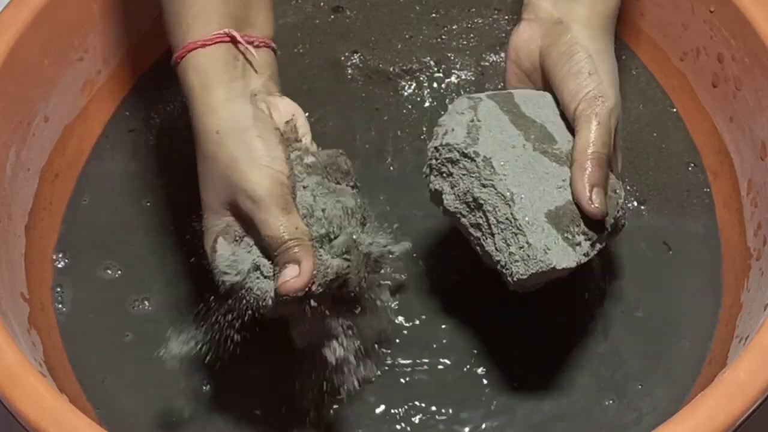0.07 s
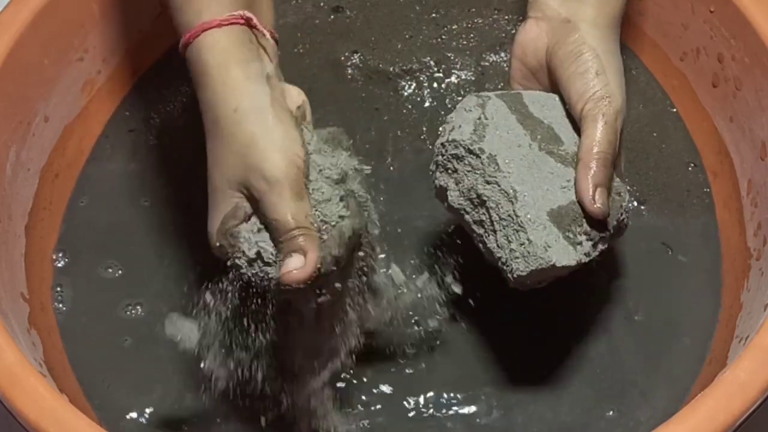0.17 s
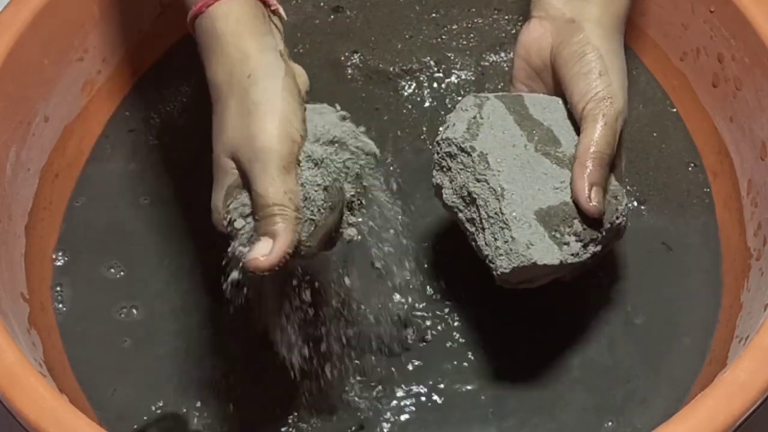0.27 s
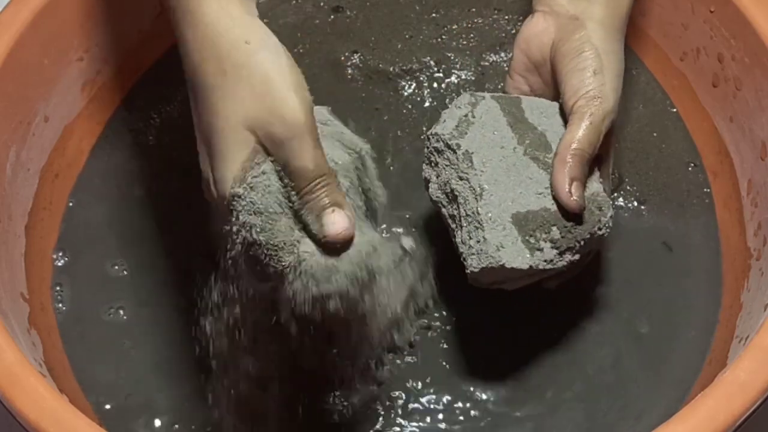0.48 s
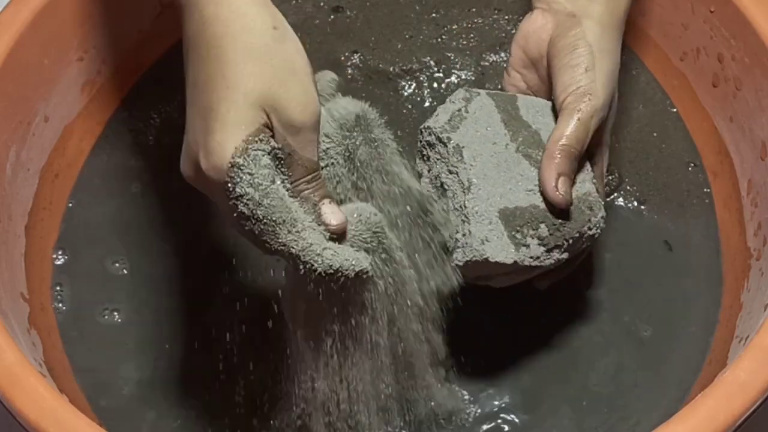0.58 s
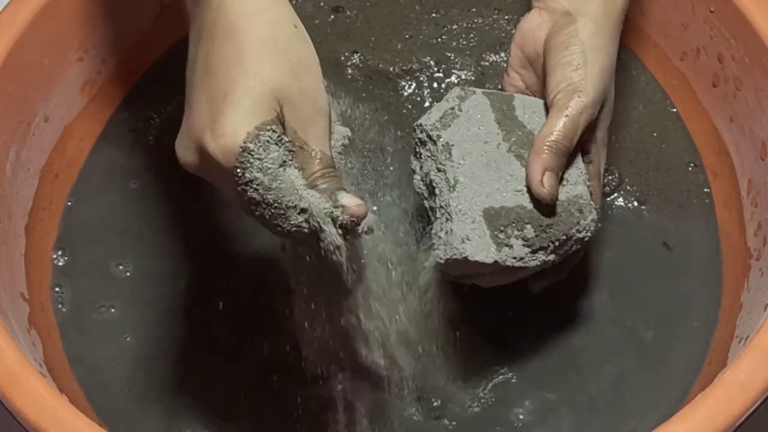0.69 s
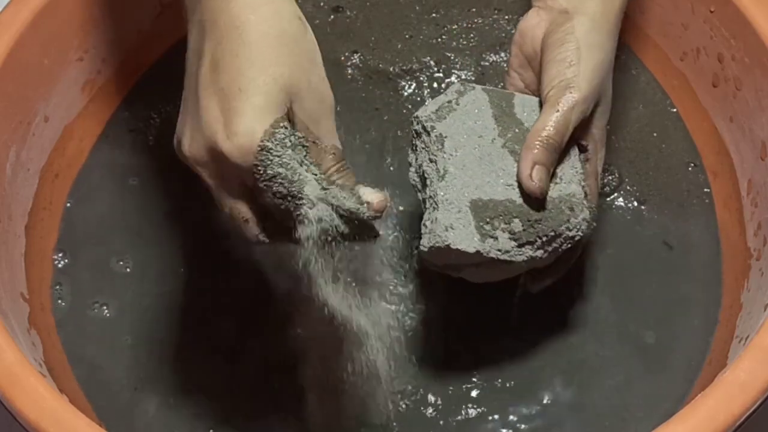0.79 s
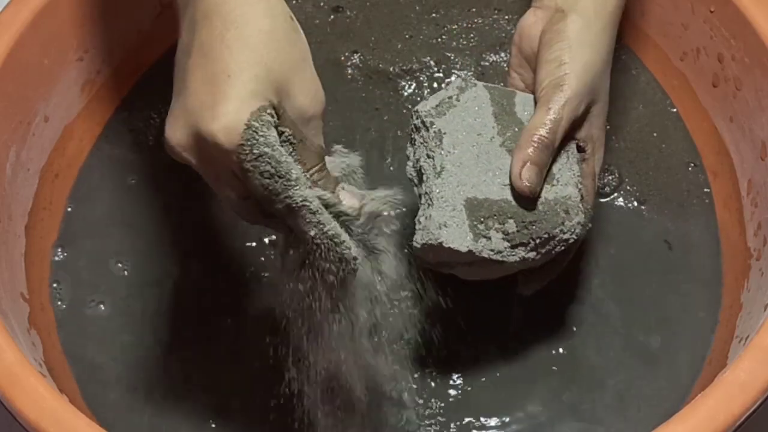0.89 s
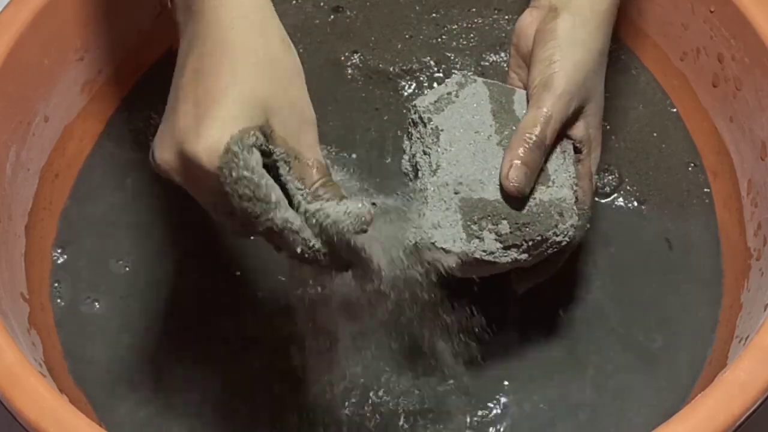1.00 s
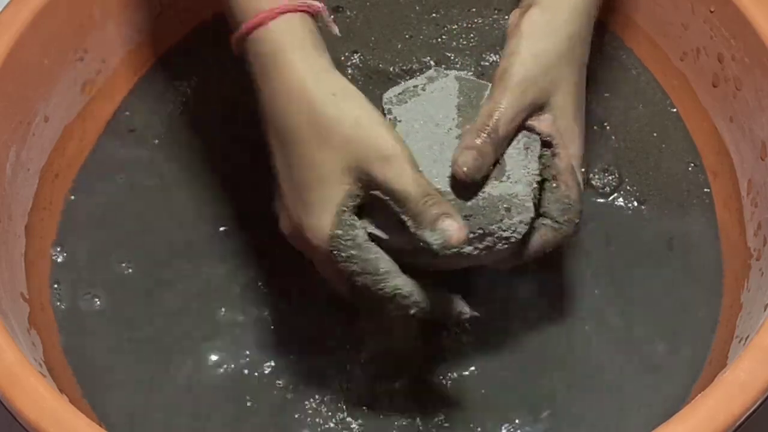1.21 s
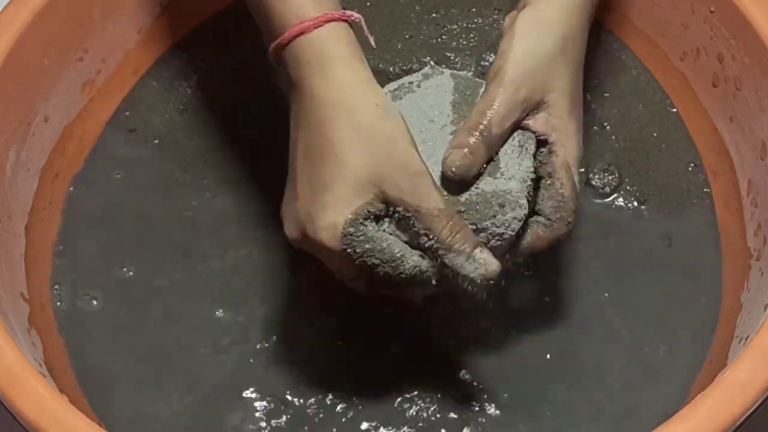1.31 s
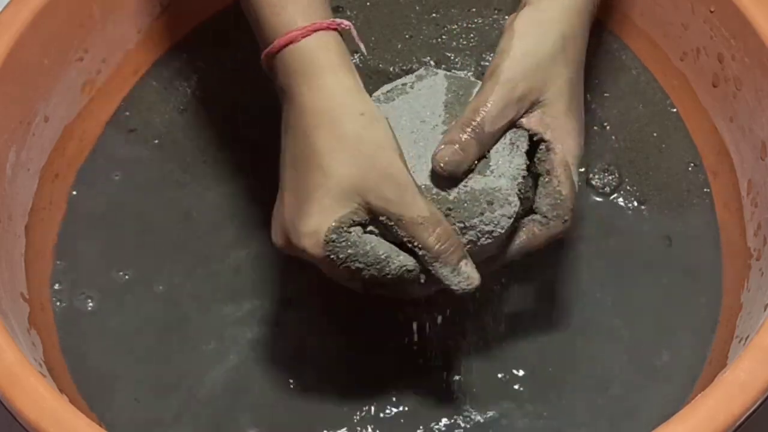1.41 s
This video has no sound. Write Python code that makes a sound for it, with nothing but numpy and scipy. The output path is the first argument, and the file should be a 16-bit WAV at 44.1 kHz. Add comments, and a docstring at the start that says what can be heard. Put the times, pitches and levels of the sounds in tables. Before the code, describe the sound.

Sand crumbles into a basin of water, heard close. A dry lump crunches faintly at about 0.1 seconds, and a clump lands with the loudest plop at 0.25. Smaller clumps and crumbs patter in with tiny bubbly plinks and a sandy fizz, thickest from 0.5 to 0.8 seconds. Lighter drips come around 1.0, thinning to faint ticks by 1.4, over a low room rumble.

```python
"""Sand crumbled into water

A hand crumbles dry sand over a plastic basin of water, close by. Clumps slap the surface and open
hollow cavities; crumbs tick and trap bubbles, which ring for a few ms as damped oscillators.
Fine sand fizzes and coarse grains tick in between. These sounds faintly excite the basin's modes
and the room's reverberation, and a low rumble lies underneath."""
import sys
import numpy as np
from scipy import signal
from scipy.fft import rfft, irfft
from scipy.io import wavfile
from scipy.ndimage import uniform_filter1d

SR = 44100
rng = np.random.default_rng(int(sys.argv[2]) if len(sys.argv) > 2 else 0)


def bounce(signal):
    """Save signal as a 16-bit WAV file at the path given by the first command-line argument."""
    frames = np.transpose(np.atleast_2d(signal))
    limited = np.clip(frames, -1, 1)
    pcm = np.round(limited * 32767).astype(np.int16)
    wavfile.write(sys.argv[1], SR, pcm)


N = 63945

# flow of falling sand: time_s, gain_db
SAND_FLOW = [(0, -6), (.075, -14.5), (0.132, -11), (.22, -3.5), (.3, -2), (.41, -10.5), (0.518, -2.5),
             (.61, -6.5), (.7, 1), (.84, -12.5), (.93, -8.5), (1.04, -6), (1.14, -10.5), (1.25, -13.5),
             (1.45, -15.5)]
# clumps hitting the water: start_s, slap_db, cavity_hz, cavity_db, cavity_decay_ms
CLUMP_IMPACTS = [(0.2476, -5, 298.4, -12.5, 3.48), (0.3115, -17.5, 482, -21.5, 3.63),
                 (0.4396, -51.5, 507, -30, 2.94), (.5060, -22.5, 410.8, -21, 2.55),
                 (0.5518, -28, 1057, -24.5, 2.48), (0.6544, -14.5, 272.4, -26.5, 4.76),
                 (0.7016, -18, 451.4, -28.5, 2.72), (0.742, -29.5, 1001, -33, 4.54)]
GRAINS_PER_S, CAVITY_ONSET_MS = 5000, 0.717
EVENT_MS = np.arange(SR // 20) * 1000 / SR  # time axis of one short event


def undb(db):
    """Decibels to amplitude ratio."""
    return 10 ** (np.asarray(db) / 20)


def level(x, db):
    """Scale to an rms level."""
    return x * undb(db) / np.sqrt(np.mean(x ** 2))


def add(out, start_s, x):
    """Superpose a short sound on the output."""
    i = max(0, int(start_s * SR))
    out[i:i + len(x)] += x[:max(0, N - i)]


def colour(x, points):
    """Minimum-phase filter through (frequency_hz, gain_db) points, by folding the cepstrum."""
    size = 8192
    hz, db = np.array(points).T
    grid_hz = np.maximum(np.arange(size // 2 + 1) * SR / size, 1)
    gain = undb(np.interp(np.log(grid_hz), np.log(hz), db))
    cepstrum = irfft(np.log(gain))
    cepstrum[1:size // 2] *= 2
    cepstrum[size // 2 + 1:] = 0
    return signal.fftconvolve(x, irfft(np.exp(rfft(cepstrum))))[:N]


def ring(hz, decay_ms, onset_ms=0.0536, rise=0.00276):
    """Damped oscillator that glides upward, as a bubble's pitch rises on nearing the surface."""
    pitch_hz = hz * (1 + rise * np.minimum(EVENT_MS / decay_ms - 1, 4))
    envelope = np.exp(-EVENT_MS / decay_ms) * (1 - np.exp(-EVENT_MS / onset_ms))
    return np.sin(2 * np.pi * np.cumsum(pitch_hz) / SR) * envelope


def impact(width_ms=0.0296, spray_db=-11, spray_ms=1.198):
    """Impact transient: one push and rebound of the surface, with a noise burst of spray."""
    u = EVENT_MS / width_ms
    decay = np.exp(-u)
    push = (1 - u) * decay
    push -= decay * push.sum() / decay.sum()  # the rebound cancels the push
    spray = rng.standard_normal(len(EVENT_MS)) * np.exp(-EVENT_MS / spray_ms)
    return push + undb(spray_db) * spray


def room_rumble():
    """Background noise of the room, strongest in the bass and fading slightly."""
    # rumble spectrum: frequency_hz, relative_density_db
    spectrum = [(20, -19), (42, -22.5), (58, -3), (73, 3), (100, 2), (170, -5.5), (300, -5.5), (500, -15),
                (1000, -30), (2500, -38), (6000, -35), (15000, -36)]
    fade_db_per_s = 0.7352
    rumble = level(colour(rng.standard_normal(N), spectrum), -46)
    return rumble * undb(-fade_db_per_s * np.arange(N) / SR)


def fine_sand():
    """Shot noise of grains, flickering hiss of dust and resonance of tiny bubbles follow the flow."""
    # spectrum of grains and dust: frequency_hz, relative_density_db
    spectrum = [(200, 7.5), (600, 17), (1200, 2), (2200, 6.5), (4000, 6), (6500, 7.5), (9000, 15.5),
                (15000, 3.5)]
    flicker_db, flicker_ms, grain_spread_db = 3.5, 3, 6.5
    bubbles_per_s, low_hz, high_hz, decay_cycles = 330, 1098.6, 4807, 6.32
    flow = undb(np.interp(np.arange(N) / SR, *np.array(SAND_FLOW).T))
    wander = uniform_filter1d(rng.standard_normal(N), int(flicker_ms * SR / 1000))
    flicker = undb(level(wander, 0) * flicker_db)
    grains = (rng.random(N) < GRAINS_PER_S / SR) * rng.choice([-1, 1], N)
    grains = grains * undb(grain_spread_db * rng.standard_normal(N))
    patter = level(colour(grains, spectrum), -46)
    hiss = level(colour(flicker * rng.standard_normal(N), spectrum), -47)
    fizz = np.zeros(N)
    for when, pitch, size, sustain in rng.random((int(bubbles_per_s * N / SR), 4)):
        hz = low_hz * (high_hz / low_hz) ** pitch
        decay_ms = 1000 * decay_cycles * (.5 + sustain) / hz
        db = -52 + 4 * min(-np.log(size), 2)
        add(fizz, when * N / SR, undb(db) * ring(hz, decay_ms))
    return flow * (patter + hiss + fizz)


def grit():
    """Coarse grains land with heavily damped ticks, louder as the flow swells; a few hard ones click."""
    # single hard grains hitting the water: start_s, level_db
    clicks = [(0.199, -31.5), (.582, -20), (.6005, -27), (0.924, -34.5), (1.2026, -31.5), (1.3318, -36.5),
              (1.3734, -34.5)]
    ticks_per_s, lowest_hz, decay_ms, spread_db = 110, 6380, 0.127, 5.5
    out = np.zeros(N)
    for k, (lag, size, pitch) in enumerate(rng.random((int(ticks_per_s * N / SR), 3))):
        start_s = (k + lag) / ticks_per_s
        flow_db = np.interp(start_s, *np.array(SAND_FLOW).T)
        db = -26 + flow_db + spread_db * (2 * size - 1)
        add(out, start_s, undb(db) * ring(lowest_hz * 2 ** (pitch ** 2), decay_ms))
    for start_s, db in clicks:
        add(out, start_s, undb(db) * (impact() + ring(lowest_hz, decay_ms)))
    return out


def crumbling_lump():
    """Fracture: the lump gives way between the fingers with a crunch of impulses and a hollow knock."""
    # crunch spectrum: frequency_hz, relative_density_db
    spectrum = [(100, 21.5), (400, -25.5), (650, -3), (1000, -2.5), (3500, -4), (15000, -7.5)]
    crack_s, half_width_s = .075, 0.0282
    grains = (rng.random(N) < GRAINS_PER_S / SR) * rng.standard_normal(N)
    swell = np.exp(-((np.arange(N) / SR - crack_s) / half_width_s) ** 2)
    out = swell * level(colour(grains, spectrum), -40)
    add(out, crack_s, undb(-42) * ring(hz=655, decay_ms=6.2, onset_ms=CAVITY_ONSET_MS))
    return out


def clumps():
    """Cavity resonance: each clump slaps the water and opens a hollow whose air rings briefly."""
    out = np.zeros(N)
    for start_s, slap_db, hz, cavity_db, decay_ms in CLUMP_IMPACTS:
        slap = undb(slap_db) * impact(width_ms=0.0612, spray_db=-12.5)
        cavity = undb(cavity_db) * ring(hz, decay_ms, CAVITY_ONSET_MS, rise=0.0242)
        add(out, start_s, slap + cavity)
    return out


def wash():
    """Water thrown up by the first clump falls back as band-limited noise with exponential decay."""
    band_hz, decay_s = [722, 1304], 0.135
    since_s = np.arange(N) / SR - CLUMP_IMPACTS[0][0]
    band = signal.butter(3, band_hz, "band", fs=SR, output="sos")
    water = level(signal.sosfilt(band, rng.standard_normal(N)), -51)
    return water * (since_s > 0) * np.exp(-np.abs(since_s) / decay_s)


def crumbs():
    """Bubble resonance: each crumb ticks and traps ringing air, from which three bubbles break off."""
    # bubbles trapped by crumbs: start_s, pitch_hz, level_db, decay_ms, entry_tick_db
    bubbles = [ (0.2478, 878.2, -9.5, 2.89, -24), (.2505, 634, -13, 1.39, -50),
               (0.258, 2108, -43, 8.6, -52), (0.265, 4080, -33, 0.63, -19.5),
               (0.285, 913.5, -32.5, 7.3, -48.5), (0.3109, 1146, -18, 3.5, -35.5),
               (0.3116, 1801, -21.5, 0.93, -50.5), (0.3695, 2243, -28.5, 2.98, -51.5),
               (0.378, 1416, -28.5, 2.5, -44.5), (0.439, 2406, -24, 1.84, -35),
               (0.4719, 3596, -32.5, 1.02, -21.5), (0.4819, 1560, -36.5, 8.35, -34),
               (0.483, 3708, -36.5, 4.2, -27.5), (.4997, 1940, -26, 0.67, -40.5),
               (0.5044, 1201, -25, 3.9, -26), (.5075, 4440, -39, 0.8, -17), (0.5114, 1765, -22, 2.88, -31),
               (0.5522, 1467, -27, 2.49, -17.5), (0.5593, 3208, -33.5, 3.67, -23),
               (0.6341, 4407, -25, 1.63, -23.5), (0.6537, 4564, -4, 0.1317, -38),
               (0.6698, 1783, -33.5, 4.8, -38.5), (0.6954, 2434, -14.5, 0.327, -24),
               (0.698, 3370, -29, 1.7, -46.5), (0.703, 4890, -30, 1.46, -50),
               (0.7205, 1447, -21, 2.47, -27), (0.7259, 4090, -31.5, 0.71, -58),
               (0.7415, 4190, -28, 0.614, -24.5), (.7440, 1194, -20.5, 2.53, -57.5),
               (0.7894, 2385, -39, 0.96, -19), (0.7912, 1388, -18.5, 2.99, -19),
               (.8180, 1840, -37.5, 5.45, -27), (0.8274, 2670, -28, 0.75, -26),
               (0.8439, 4010, -28, 0.498, -29.5), (0.8592, 4836, -33.5, 2.07, -25.5),
               (0.8882, 1822, -40, 5.93, -28), (0.898, 3310, -37.5, 1.62, -44.5),
               (0.992, 1536, -33.5, 4.5, -21), (1.0016, 1574, -29.5, 2.72, -28),
               (1.03, 4220, -13, 0.083, -21), (1.0369, 4674, -25, 1.65, -49),
               (1.0404, 1874, -22.5, 2.56, -29.5), (1.0477, 5626, -15.5, 0.32, -39.5),
               (1.0493, 3008, -16, 0.413, -17), (1.0843, 2185, -35, 3.48, -46),
               (1.1313, 3716, -28.5, 1.36, -63), (1.1444, 2211, -19, 0.928, -22)]
    spatter_db, spatter_window_s, spatter_decay_ms = -11.5, 0.006, 0.808
    out = np.zeros(N)
    for start_s, hz, db, decay_ms, tick_db in bubbles:
        add(out, start_s, undb(tick_db) * impact() + undb(db) * ring(hz, decay_ms))
        for lag, pitch in rng.random(size=(3, 2)):
            octaves = 0.7946 * (2 * pitch - .5)
            spatter = ring(hz * 2 ** octaves, min(decay_ms, spatter_decay_ms))
            add(out, start_s + lag * spatter_window_s, undb(db + spatter_db) * spatter)
    return out


def basin_and_room(x):
    """Convolution with an impulse response: the basin's normal modes and the room's short, dull tail."""
    # modes of the basin: pitch_hz, relative_level_db, t60_s
    modes = [(378.64, -2, 0.89), (468.8, -10, 0.397), (650.5, -5.5, 0.57), (700.2, 14.5, 0.033),
             (871.2, -9.5, 0.837), (887.8, -8.5, 1), (1045.2, 15, 0.0363), (1773, -2.5, 0.18)]
    basin_db, room_db, room_t60_s, room_delay_s, room_top_hz = -58.5, -15, 0.656, 0.011, 3190
    t = np.arange(SR // 2) / SR
    basin = sum(undb(db + basin_db - 60 * t / t60_s) * np.sin(2 * np.pi * hz * t)
                for hz, db, t60_s in modes)
    tail = rng.standard_normal(len(t)) * undb(-60 * t / room_t60_s) * (t > room_delay_s)
    lowpass = signal.butter(1, room_top_hz, fs=SR, output="sos")
    tail = signal.sosfilt(lowpass, tail / np.linalg.norm(tail))
    return signal.fftconvolve(x, basin + undb(room_db) * tail)[:N]


def scene():
    """Superposition of the direct sound, the response of basin and room, and the rumble."""
    rumble = room_rumble()
    direct = clumps() + wash() + crumbs() + crumbling_lump() + fine_sand() + grit()
    return (direct + basin_and_room(direct) + rumble)[None]


def record(dry):
    """An equaliser curve notches the treble; faint microphone hiss and band limits follow."""
    # equaliser curve: frequency_hz, gain_db
    equaliser = [(20, -9.5), (4600, 2.5), (4750, -7), (5900, -9.5), (6500, -4.5), (8400, -22.5),
                 (8600, -35), (11500, -30.5), (11650, -10), (15400, -4.5), (15900, -27.5)]
    hiss_db, low_cut_hz, top_hz = -82, 60, 16660
    x = colour(dry[0], equaliser) + undb(hiss_db) * rng.standard_normal(N)
    x = signal.sosfilt(signal.butter(6, low_cut_hz, "high", fs=SR, output="sos"), x)
    return signal.sosfilt(signal.ellip(8, .2, 70, top_hz, fs=SR, output="sos"), x)[None]


dry = scene()
out = record(dry)
bounce(out)
```